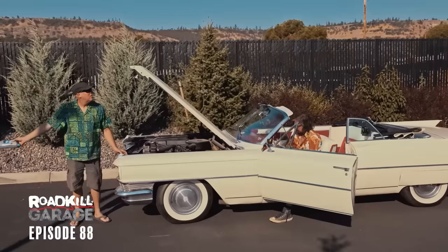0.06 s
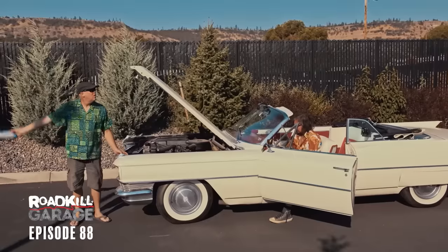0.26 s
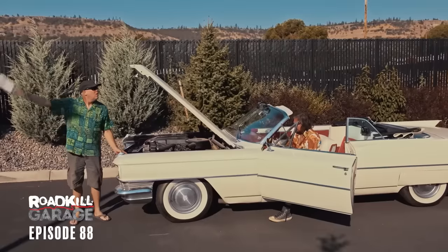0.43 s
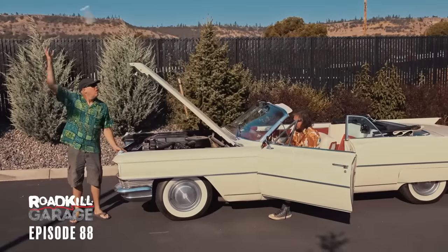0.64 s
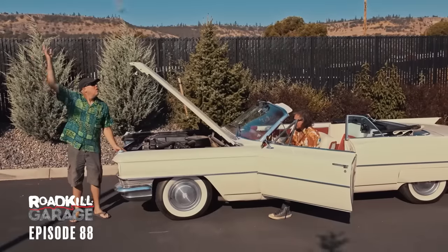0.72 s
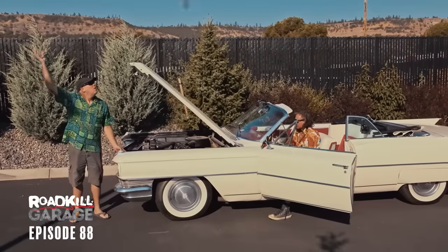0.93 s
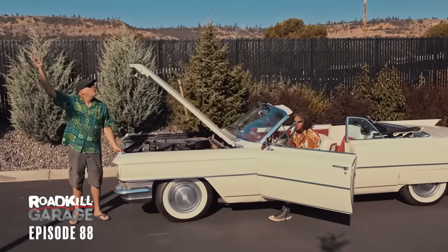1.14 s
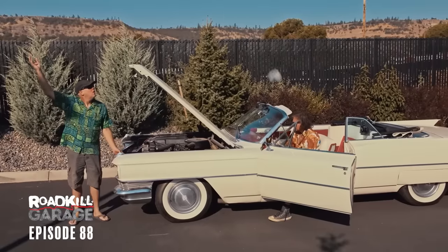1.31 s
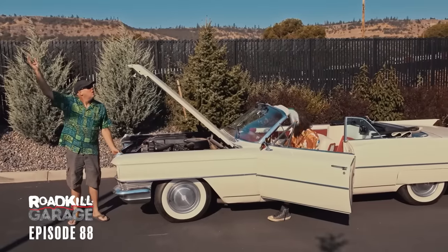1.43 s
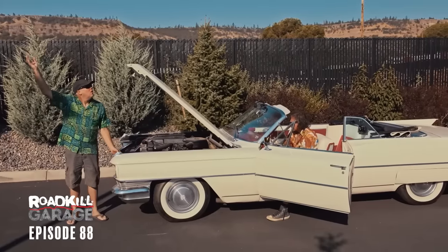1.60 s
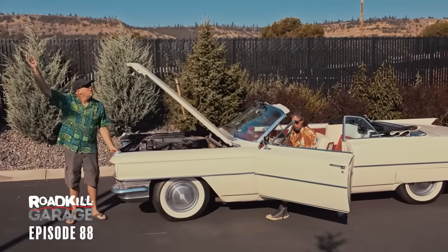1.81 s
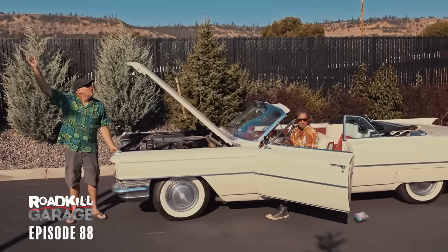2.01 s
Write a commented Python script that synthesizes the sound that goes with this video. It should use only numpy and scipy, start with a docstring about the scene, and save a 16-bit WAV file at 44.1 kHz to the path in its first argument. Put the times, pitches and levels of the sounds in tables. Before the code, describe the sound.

Hollow plastic bottle clatter on hard ground after a faint jingle and a quiet toss

```python
"""Bottle tossed across a driveway

An empty plastic bottle is tossed high across an open driveway and lands in a few quick, hollow knocks.
Before it, the gripped wall crinkles, a small metal piece jingles against plastic as decaying modes, a
sleeve swishes as coloured noise, and soft bumps sound around the release as puffs with damped tones.
Each knock sums wall flutter, shell modes and a struck panel; pops, snaps and thuds join them.
The yard scatters it all faintly, over quiet air noise and a wavering outdoor rumble.
"""
import sys
import numpy as np
from scipy import signal
from scipy.fft import rfft, irfft
from scipy.io import wavfile
from scipy.ndimage import uniform_filter1d

SR = 44100
rng = np.random.default_rng(int(sys.argv[2]) if len(sys.argv) > 2 else 0)


def dump(signal):
    """Clip the signal to [-1, 1] and save it as 16-bit WAV at the path in sys.argv[1]."""
    limited = np.clip(np.atleast_2d(signal).T, -1, 1)
    pcm = np.round(limited * 32767).astype(np.int16)
    wavfile.write(sys.argv[1], SR, pcm)


N = 90757  # length of the scene [samples]

# Outdoor air, spectrum shape: (frequency [Hz], relative level [dB])
AIR_SHAPE = [(15, -33), (25, -21), (87, -0.5), (206, -7), (256, -18.5), (591, -24.5), (677, -25.5),
             (818, -21.5), (3160, -37.5), (8830, -42.5), (16000, -43.5)]
AIR_DB = -55
# Low rumble outdoors: (time [s], level [dB])
RUMBLE_LEVEL = [(0, -48.5), (.16, -50.5), (.3, -53), (.55, -54.5), (.75, -63.5), (1.25, -73), (1.42, -53.5),
                (1.75, -53.5), (2.06, -59)]
# Noise around the rumble tone, spectrum shape: (frequency [Hz], relative level [dB])
RUMBLE_SKIRT = [(30, -22), (60, -7.5), (100, -5.5), (150, -4), (210, -13.5), (300, -16), (1000, -41),
                (16000, -83)]
RUMBLE_SKIRT_DB = -5.5  # relative to the tone
RUMBLE_HZ = 90.4
RUMBLE_WANDER, RUMBLE_FLUTTER = 0.0616, 0.37  # rms fractions of pitch and of amplitude

# Swish of the sleeve: (time [s], level [dB])
SWISH_LEVEL = [(0, -56), (.13, -57), (.29, -68), (.42, -60), (.51, -56.5), (.6, -59), (.72, -65),
               (.85, -70.5), (1.2, -73), (2.06, -118)]
# Colour of the cloth, spectrum shape: (frequency [Hz], relative level [dB])
SWISH_SHAPE = [(100, -2.5), (400, 1.5), (1000, -7), (2500, -13.5), (5500, -11.5), (9000, -14), (15000, -22)]

# Fine crinkling of the bottle in the hand: (time [s], level [dB])
CRINKLE_LEVEL = [(0, -57), (.14, -63.5), (.22, -85), (.32, -71), (.6, -68), (.8, -77)]
# Colour of the crinkling, spectrum shape: (frequency [Hz], relative level [dB])
CRINKLE_SHAPE = [(400, -14), (2000, 9), (3500, 11), (5500, -11), (8000, 20.5), (10500, -6), (13000, 5),
                 (16000, -5)]
# Small rings of the gripped wall: (frequency [Hz], relative level [dB], t60 [s])
GRIP_MODES = [(2015, 2.5, 0.046), (2990, 0, 0.063), (5400, 4, 0.019)]
# Firm dents of the grip that ring the wall: (time [s], level [dB])
DENTS = [(0.1155, -51.5), (0.159, -61)]
CRACKS_PER_S, CRACK_T60_S, CRACK_SPREAD_DB = 160, 0.011, 6
GRIP_DB = -10  # small rings relative to the noise bursts
LET_GO_S = 0.62

# Clinks of the small metal piece: (time [s], level [dB], pitch [Hz], ring t60 [s])
CLINKS = [(0.0137, -40, 14370, 0.05), (0.024, -37.5, 14800, 0.011), (.0260, -32, 14200, 0.029),
          (0.06, -59, 14000, 0.015), (0.065, -54.5, 13000, 0.12), (.0910, -45.5, 13330, 0.039),
          (.1150, -38.5, 13620, 0.12), (.1410, -43, 14000, 0.018), (0.1581, -34.5, 13300, 0.02),
          (0.162, -38.5, 12960, 0.036), (0.179, -44.5, 12800, 0.013), (0.196, -38.5, 13700, .025),
          (0.2457, -41, 13120, 0.039), (0.258, -53, 13400, 0.013), (0.2931, -47.5, 12250, 0.032),
          (0.309, -52, 12500, 0.015), (.3370, -46.5, 12940, 0.016), (0.5803, -40.5, 13150, 0.023),
          (0.581, -37, 14400, 0.0083)]
# Modes of the clink, plastic of the bottle in the three lowest, metal above:
# (multiple of the pitch, relative level [dB])
CLINK_MODES = [(0.147, -20.5), (0.216, -24), (0.387, -20), (0.411, -27), (0.531, -11), (0.565, -2),
               (0.595, -15), (.655, -12.5), (.9, -12), (.94, -17), (1.001, 3)]
# Colour of the contact tick, spectrum shape: (frequency [Hz], relative level [dB])
TICK_SHAPE = [(500, -12), (3500, -1), (5500, 9.5), (8000, 2), (10500, -8), (13000, -23), (16000, -19)]
TICK_DB, TICK_T60_S = -7, 0.02  # level relative to the clink
CLINK_RISE_S = 0.00031
CLINK_SPREAD_DB = 4
RATTLE_RADIANS, RATTLE_SMOOTH = 0.33, 40  # rms phase waver; smoothing [samples]

# Soft bumps around the throw: (time [s], level [dB], puff t60 [s])
BUMPS = [(0.5307, -45.5, 0.04), (.549, -55, 0.078), (0.7078, -44.5, 0.11), (.722, -53.5, 0.079),
         (1.172, -57, 0.13)]
# Colour of the puff, spectrum shape: (frequency [Hz], relative level [dB])
BUMP_SHAPE = [(60, -28), (180, 7), (400, -2.5), (850, -2.5), (1400, -13), (2500, -14), (4000, -24),
              (9000, -20.5), (16000, -63)]
# Dull tone of the bumps: (frequency [Hz], relative level [dB])
BUMP_MODES = [(170, -6), (240, -0.5), (400, -1.5), (600, 0), (880, -9)]
BUMP_RING_T60_S, BUMP_RISE_S = 0.058, 0.00033

# Blows on the bottle and ringing that carries on after them (1.56 s): (time [s], bass [dB],
# body [dB], clack [dB], treble [dB], shell ring [dB], struck panel pitch [Hz], panel [dB])
KNOCKS = [(1.5327, -10.5, -10, -11, -30.5, -15, 938, -22.5), (1.5360, -5, -10, -17.5, -43, 6, 757, -15),
          (1.5455, -23, -9, -30, -38, -26, 1465, -24), (1.5600, -13, -22, -51, -66, -34, 303.3, -21),
          (1.8105, -22, -5.5, -2, -20, -12.5, 2460, -19.5), (1.8134, -4.5, -0.5, -8.5, -38, -2, 799, -15),
          (1.8175, -4.5, -10, -20.5, -24, -22, 430, -23.5), (1.9094, -28, -20, -10, -23.5, -14, 2626, -22),
          (1.9115, -9, -10, -15, -44, 0.5, 4980, -28), (1.9135, -27, -35, -17, -33, -24, 1163, -25.5),
          (1.9160, -18, -12, -17.5, -30.5, -27, 721, -21), (1.9300, -12.5, -21, -20, -58, -27, 310, -28.5),
          (1.9460, -9, -5, -19, -29.5, 0.5, 787, -24), (1.9480, -18, -8, -27, -36, -15, 338.6, -17),
          (1.9743, -18, -23.5, -26, -43.5, -20, 441, -31.5),
          (2.0330, -13.5, -32.5, -40, -54, -8.5, 193, -50)]
# Centres of the bass, body, clack and treble columns: (frequency [Hz])
CONTACT_HZ = [200, 650, 2000, 6000]
TOP_DB = 3.5  # added to the treble level at EDGE_HZ
# Modes of the shell and the air in it: (frequency [Hz], relative level [dB], t60 [s])
SHELL_MODES = [(182.8, -21, 0.24), (222, -30, 0.34), (314.7, -24, .17), (342.4, -32, 0.18),
               (439.6, -23, 0.16), (526.4, -20.5, 0.092), (594, -20.5, 0.1), (737, -24.5, 0.059),
               (785, -25.5, 0.041), (880, -32, 0.073), (1190, -29, 0.08), (1460, -41, 0.034),
               (1682, -25.5, 0.07), (1980, -20.5, 0.037), (2460, -24, 0.059), (2970, -19, 0.041),
               (4600, -50, .035), (8300, -38, .043), (8300, -30, 0.033)]
# Dense flutter of the thin wall, filter gain: (frequency [Hz], gain [dB])
WALL_SHAPE = [(40, -34.5), (135, 27), (260, 17.5), (480, 23), (830, 23.5), (1020, 15), (1250, 17),
              (2200, 12.5), (3600, 12.5), (8000, 11), (16000, 1)]
# Ring time of that flutter: (frequency [Hz], t60 [s])
WALL_T60 = [(100, 0.076), (450, 0.13), (1000, 0.063), (2500, 0.078), (7000, 0.06), (16000, 0.04)]
SHELL_RISE_S, WALL_RISE_S = 0.0002, 0.00023
SLAP_DB = -9  # first impulse of the slap, ahead of the wall filter
PANEL_T60_S, PANEL_T60_SLOPE = 0.041, 0.76  # ring time at 1 kHz; higher panels die sooner
HOLLOW_HZ, HOLLOW_Q = 265, 11  # the body hardly sounds between its two lowest pairs of modes
# Bending waves travel at different speeds, slowest in the bass: (frequency [Hz], delay [s])
BENDING_LAG = [(100, 0.0073), (200, 0.0013), (400, 0.0003), (1000, 0.000052), (3000, 0.000843)]
RADIATE_HZ = 121  # the small bottle radiates little below this
# The wall buckles and snaps back: (time [s], level [dB], decay constant [s])
SNAPS = [(1.5346, -10, 0.0028), (1.5414, -18.5, 0.0015), (1.5458, -18, 0.008), (1.716, -39.5, 0.0071),
         (1.8133, -7.5, 0.0016), (1.892, -44, 0.0057), (1.944, -23.5, 0.0036), (1.97, -41, 0.0009),
         (1.995, -43, 0.0026)]
# Colour of the snaps, filter gain: (frequency [Hz], gain [dB])
SNAP_SHAPE = [(500, -41), (2500, -6), (5000, 5), (8200, 5), (11000, 0), (15500, -8)]
# A panel pops inward under the hardest blows: (time of centre [s], level [dB], centre frequency [Hz])
POPS = [(1.5381, -9.5, 1270), (1.8152, -9.5, 600), (1.953, -20, 446)]
# Low thuds that swell under the heavy blows: (time [s], level [dB], frequency [Hz], t60 [s])
THUDS = [(1.549, -28.5, 79, 0.26), (1.819, -16.5, 80.5, 0.078)]
THUD_RISE_S = 0.022

# Scatter from the yard: (frequency [Hz], t60 [s])
YARD_T60 = [(150, 0.3), (500, 0.18), (1500, 0.07), (4000, 0.25), (12000, 0.031)]
YARD_DB, YARD_RISE_S = -22.5, 0.036
EDGE_HZ = 16300  # upper band limit of the recorder


def amp(db):
    """Turns decibels into gain."""
    return 10 ** (np.asarray(db) / 20)


def unit(x):
    """Scales to an rms of 1."""
    return x / np.sqrt(np.mean(x ** 2) + 1e-20)


def read(points, hz):
    """Reads a table on a log-frequency axis."""
    f, value = np.transpose(points)
    return np.interp(np.log(hz + 1), np.log(f + 1), value)


def level(points):
    """Gain over the whole scene from (time [s], level [dB]) points."""
    return amp(np.interp(np.arange(N) / SR, *np.transpose(points)))


def add(mix, s, sound):
    """Lays a sound into the mix from time s, cut at the end of the scene."""
    part = mix[max(round(s * SR), 0):][:len(sound)]
    part += sound[:len(part)]


def seconds():
    """Time axis of one short event, a quarter of a second."""
    return np.arange(SR // 4) / SR


def fade(t, t60):
    """Exponential decay, 60 dB down at t60."""
    return np.exp(-np.log(1000) * t / t60)


def sine(hz, t):
    """Plain tone starting at zero."""
    return np.sin(2 * np.pi * hz * t)


def random_phases(count):
    """Unit spectrum lines of random phase."""
    return np.exp(2j * np.pi * rng.random(count))


def colour(x, points, size=4096):
    """Causal minimum-phase filter with the given (frequency [Hz], gain [dB]) shape."""
    log_gain = np.log(amp(read(points, abs(np.fft.fftfreq(size, 1 / SR)))))
    response = np.exp(np.conj(signal.hilbert(log_gain)))
    taps = np.fft.ifft(response).real
    return signal.fftconvolve(x, taps[:size // 2])[:len(x)]


def noise(points, count):
    """Steady coloured noise, rms 1."""
    hz = np.fft.rfftfreq(count, 1 / SR)
    return unit(irfft(amp(read(points, hz)) * random_phases(len(hz)), count))


def tail(t60s, rise_s, count=20):
    """Dense ringing: bands waver in pitch and die at their own speeds; flat spectrum, energy about 1."""
    t = seconds()
    hz = np.fft.rfftfreq(len(t), 1 / SR)
    centres = np.geomspace(70, 16000, count)
    out = np.zeros(len(t))
    for centre, pick in zip(centres, np.eye(count)):
        share = np.interp(hz, centres, pick)
        band = irfft(np.sqrt(share) * random_phases(len(hz)), len(t))
        # keeping only the phase evens out the loudness of the band
        steady = np.cos(np.angle(signal.hilbert(band)))
        band = irfft(np.sqrt(share) * rfft(steady), len(t))
        decaying = band * fade(t, read(t60s, centre)) * (1 - np.exp(-t / rise_s))
        out += unit(decaying) * np.sqrt(share.mean() / len(t))
    return out


def slow_waver():
    """Slow random motion over the scene, rms 1."""
    smooth = uniform_filter1d(rng.standard_normal(N), size=1200)
    return unit(uniform_filter1d(smooth, size=1200))


def outdoors():
    """Quiet air as steady noise, and a low tone with a skirt of noise, wavering in pitch and strength."""
    turns = np.cumsum(RUMBLE_HZ * (1 + RUMBLE_WANDER * slow_waver())) / SR
    drone = unit(np.sin(2 * np.pi * turns) * (1 + RUMBLE_FLUTTER * slow_waver()))
    skirt = amp(RUMBLE_SKIRT_DB) * noise(RUMBLE_SKIRT, N)
    air = amp(AIR_DB) * noise(AIR_SHAPE, N)
    return air + level(RUMBLE_LEVEL) * (drone + skirt)


def sleeve():
    """Cloth rubs as coloured noise that follows the swing of the arm."""
    return level(SWISH_LEVEL) * noise(SWISH_SHAPE, N)


def crinkle():
    """Random cracks and firm dents ring the gripped wall; the cracks stop when the hand lets go."""
    t = seconds()
    strength_db = CRACK_SPREAD_DB * np.minimum(rng.exponential(1, N), 2)
    cracks = (rng.random(N) < CRACKS_PER_S / SR) * amp(strength_db)
    envelope = signal.fftconvolve(cracks, fade(t, CRACK_T60_S))[:N]
    bursts = envelope * noise(CRINKLE_SHAPE, N)
    ring = sum(amp(db) * fade(t, t60) * sine(hz, t) for hz, db, t60 in GRIP_MODES)
    rings = signal.fftconvolve(cracks, ring)[:N]
    held = np.arange(N) / SR < LET_GO_S
    out = level(CRINKLE_LEVEL) * (unit(bursts) + amp(GRIP_DB) * unit(rings)) * held
    for s, db in DENTS:
        add(out, s, amp(db) * ring)
    return out


def jingle():
    """Each clink is a bright tick and a set of plastic and metal modes that waver as the piece rattles."""
    out, t = np.zeros(N), seconds()
    for s, db, pitch, t60 in CLINKS:
        # loose contact makes the phase of the ring waver
        rattle = uniform_filter1d(rng.standard_normal(len(t)), size=RATTLE_SMOOTH)
        waver = RATTLE_RADIANS * unit(rattle)
        ring = np.zeros(len(t))
        for ratio, mode_db in CLINK_MODES:
            gain = amp(mode_db + CLINK_SPREAD_DB * (2 * rng.random() - 1.5))
            ring += gain * np.sin(2 * np.pi * (pitch * ratio * t + rng.random()) + waver)
        tick = amp(TICK_DB) * noise(TICK_SHAPE, len(t)) * fade(t, TICK_T60_S)
        rise = 1 - np.exp(-t / CLINK_RISE_S)
        add(out, s, amp(db) * (ring * fade(t, t60) + tick) * rise)
    return out


def bumps():
    """Each dull bump is a puff of noise and a few damped tones."""
    out, t = np.zeros(N), seconds()
    tone = sum(amp(db) * sine(hz, t) for hz, db in BUMP_MODES) * fade(t, BUMP_RING_T60_S)
    for s, db, t60 in BUMPS:
        puff = noise(BUMP_SHAPE, len(t)) * fade(t, t60)
        add(out, s, amp(db) * (puff + tone) * (1 - np.exp(-t / BUMP_RISE_S)))
    return out


def disperse(x):
    """Delays each pitch by its bending-wave lag, the bass most, and thins out the lowest notes."""
    size = 2 * len(x)
    hz = np.fft.rfftfreq(size, 1 / SR)
    turns = np.cumsum(read(BENDING_LAG, hz)) * hz[1]  # summed delay gives phase
    late = irfft(rfft(x, size) * np.exp(-2j * np.pi * turns), size)[:len(x)]
    return signal.sosfilt(signal.butter(2, RADIATE_HZ, "high", fs=SR, output="sos"), late)


def knock(bass_db, body_db, clack_db, treble_db, ring_db, panel_hz, panel_db):
    """Wall, shell and panel ring together; the contact colours wall and shell."""
    t = seconds()
    shell = np.zeros(len(t))
    for k, (hz, db, t60) in enumerate(SHELL_MODES):
        sign = (-1) ** k  # neighbouring modes start in opposite phase
        shell += sign * amp(db) * fade(t, t60) * np.cos(2 * np.pi * hz * t)
    shell *= np.minimum(t / SHELL_RISE_S, 1)
    slap = amp(SLAP_DB) * (t == 0)
    wall = colour(tail(WALL_T60, WALL_RISE_S) - slap, WALL_SHAPE)
    contact = list(zip(CONTACT_HZ, (bass_db, body_db, clack_db, treble_db)))
    contact.append((EDGE_HZ, treble_db + TOP_DB))
    panel_t60 = PANEL_T60_S / (panel_hz / 1000) ** PANEL_T60_SLOPE
    panel = amp(panel_db) * fade(t, panel_t60) * sine(panel_hz, t)
    body = colour(wall + amp(ring_db) * shell, contact) + panel
    return disperse(signal.lfilter(*signal.iirnotch(HOLLOW_HZ, HOLLOW_Q, SR), body))


def snap(db, decay_s):
    """A short cluster of tiny cracks in the plastic, as decaying noise."""
    t = seconds()
    cracks = rng.standard_normal(len(t)) * np.exp(-t / decay_s)
    return amp(db) * colour(cracks / np.linalg.norm(cracks), SNAP_SHAPE)


def pop(hz):
    """One sharp dip of pressure with a small swell on either side, centred in its sound."""
    t = seconds()
    u = np.pi * hz * (t - t.mean())
    return (2 * u ** 2 - 1) * np.exp(-u ** 2)


def thud(db, hz, t60):
    """A low damped tone that swells in gradually."""
    t = seconds()
    return amp(db) * (1 - np.exp(-t / THUD_RISE_S)) * fade(t, t60) * sine(hz, t)


def landing():
    """The falling bottle strikes: knocks ring it, panels pop, the wall snaps and low thuds swell."""
    out = np.zeros(N)
    for s, *blow in KNOCKS:
        add(out, s, knock(*blow))
    for s, db, hz in POPS:
        add(out, s - seconds().mean(), amp(db) * pop(hz))
    for s, db, decay_s in SNAPS:
        add(out, s, snap(db, decay_s))
    for s, db, hz, t60 in THUDS:
        add(out, s, thud(db, hz, t60))
    return out


def yard(direct):
    """Scatter from the yard: the direct sound smeared by a dense tail that dies at its own speed per band."""
    scatter = signal.fftconvolve(direct, tail(YARD_T60, YARD_RISE_S))[:N]
    return amp(YARD_DB) * scatter


def scene():
    """Direct sound of the throw and landing, its scatter, and the outdoor bed; one channel."""
    direct = sleeve() + crinkle() + jingle() + bumps() + landing()
    return (direct + yard(direct) + outdoors())[None]


def record(dry):
    """The recorder's band limit, a steep low-pass."""
    taps = signal.firwin(255, EDGE_HZ, window=("kaiser", 9), fs=SR)
    return signal.oaconvolve(dry, taps[None], "same")


dry = scene()
out = record(dry)
dump(out)
```